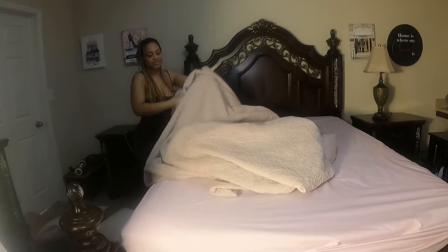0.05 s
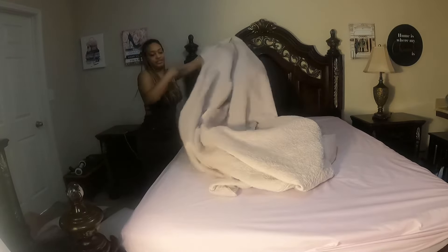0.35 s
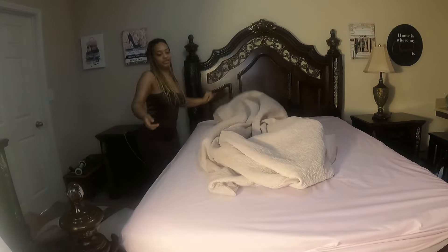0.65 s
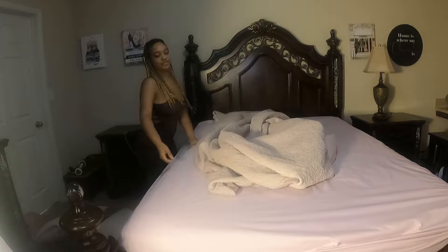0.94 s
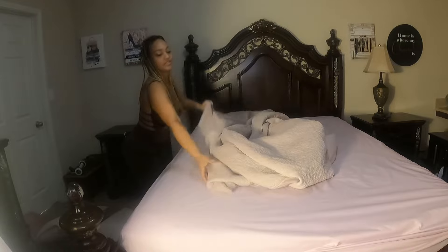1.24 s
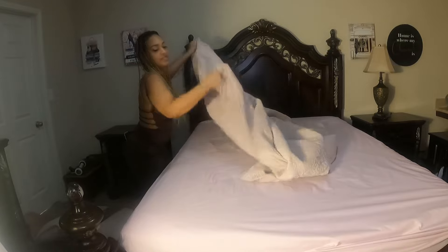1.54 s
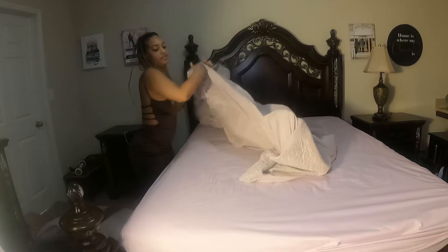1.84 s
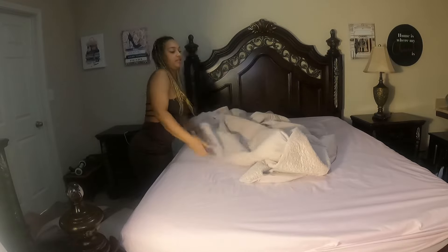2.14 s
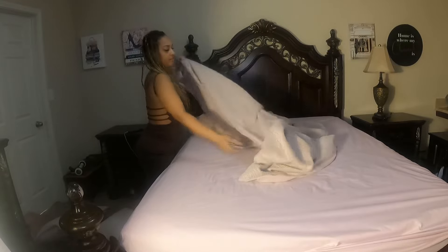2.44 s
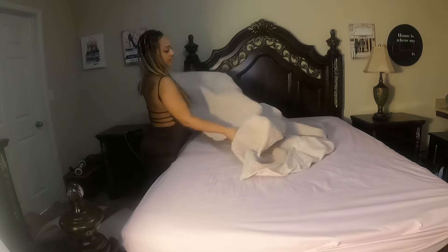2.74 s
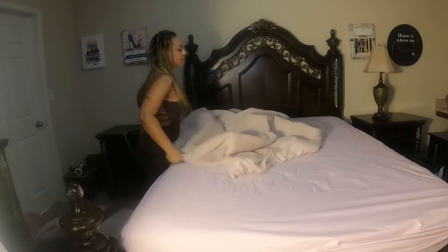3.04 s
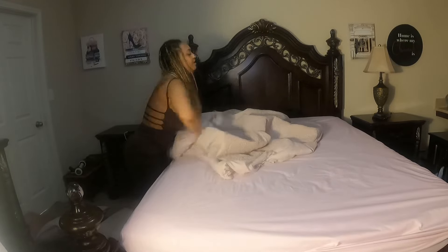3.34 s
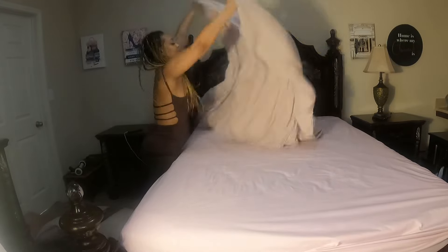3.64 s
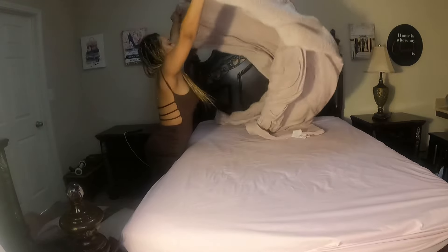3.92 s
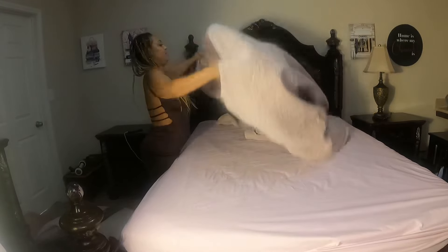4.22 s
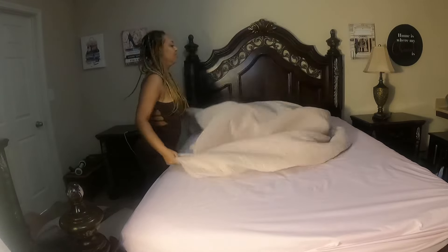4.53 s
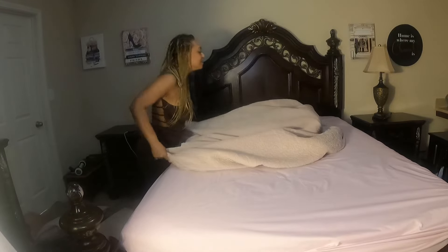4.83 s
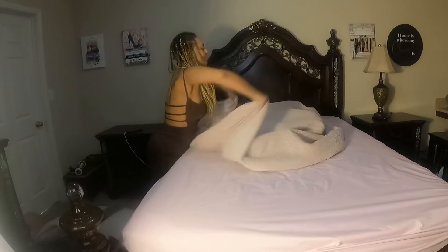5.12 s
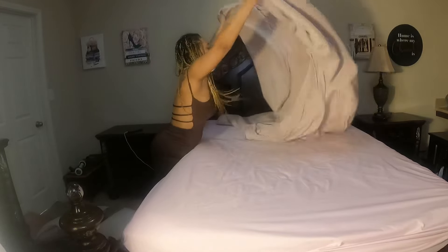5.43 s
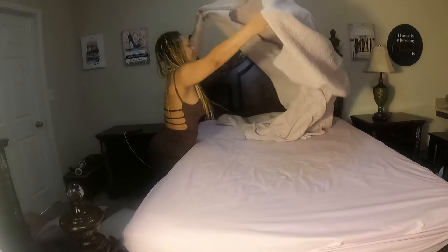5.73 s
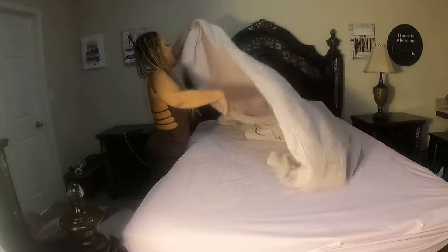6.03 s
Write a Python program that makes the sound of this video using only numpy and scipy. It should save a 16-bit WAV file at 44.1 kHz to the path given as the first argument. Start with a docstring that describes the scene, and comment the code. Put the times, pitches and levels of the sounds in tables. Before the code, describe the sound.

A thick bedspread is tossed, gathered and shaken out over a bed, with cloth rustling, whooshes of air and soft thumps.

```python
"""A thick bedspread is handled over a bed in a small bedroom, above a steady low hum of the room's standing
waves. First it slides, hissing by friction, and is tossed aside; the heap drops at 0.8 s with a wave of air.
From 1.2 s it is gathered up: a nail zips over the weave, folds slap and the hem snaps. It is shaken out at 3.6
s and floats down at 4.4 s, its landing folds exciting mattress and room modes. At 5.2 s a seam ticks through
the fingers and a second shake follows; a last swing comes at 6 s."""
import sys
import numpy as np
from scipy import signal
from scipy.fft import rfft, irfft, next_fast_len
from scipy.io import wavfile
from scipy.ndimage import uniform_filter1d, map_coordinates

SR = 44100
rng = np.random.default_rng(int(sys.argv[2]) if len(sys.argv) > 2 else 0)


def file_out(sig):
    """Save sig as 16-bit WAV at sys.argv[1]."""
    # one column per channel
    cols = np.atleast_2d(sig).T
    # limit, then scale
    lim = np.clip(cols, -1, 1)
    pcm = np.round(lim * 32767).astype(np.int16)
    wavfile.write(sys.argv[1], SR, pcm)


N = 267687

# Standing waves of the room that hum in the background: f/Hz, bandwidth/Hz, level/dB
HUM_RESONANCES = [(156.2, 36, -4.5), (199.5, 29, 0), (284, 7.6, -16)]
# Cloth drawn over cloth: start t/s, duration/s, rustle level/dB, hiss level/dB, swell/dB
PULLS = [ (-0.009, 0.36, -61.5, -63.5, 9.5), (.5, 0.33, -68.5, -75.5, 12), (1.093, 0.085, -77, -66.5, 0.5),
         (1.17, 0.26, -66, -68.5, 13), (1.377, 0.24, -63, -64.5, -5.5), (1.577, .21, -59.5, -59.5, 4),
         (2.03, 0.077, -57, -64.5, 4.5), (2.242, 0.032, -56.5, -71, 3.5), (2.362, 0.28, -54, -57, 5),
         (2.764, 0.16, -58, -63, 5), (3.046, 0.14, -55.5, -58.5, -0.5), (3.425, 0.1, -75, -65, 4),
         (3.516, 0.2, -49, -56, 5.5), (3.717, 0.13, -49, -53.5, 4), (3.982, 0.11, -66.5, -69.5, 2),
         (4.1, 0.15, -79, -72, 3), (4.298, 0.13, -62, -66.5, 5), (4.438, 0.041, -49, -61.5, -0.5),
         (4.566, 0.012, -48.5, -59.5, 1), (4.685, 0.15, -77, -68, -2.5), (5.002, 0.23, -77, -78.5, -9),
         (5.221, 0.082, -43, -47.5, 4), (5.41, 0.06, -58, -65.5, 12), (5.568, 0.072, -63, -62, -3.5),
         (5.85, 0.13, -65, -62, 9), (5.99, 0.1, -46, -55.5, 9)]
# The sheet swung, lifted or let fall: top-speed t/s, rise/s, fall/s, air level/dB, fold level/dB
SHEET_SWINGS = [ (.135, 0.48, 0.3, -51.5, -49.5), (.335, 0.35, 0.13, -61, -43.5),
                (0.393, 0.28, 0.2, -41, -44.5), (0.814, 0.19, 0.13, -25, -30.5),
                (1.2, 0.72, 0.5, -51, -60.5), (1.4, 0.35, 0.55, -53, -49.5), (1.64, 0.24, 0.86, -55.5, -55),
                (2.045, 0.11, 0.16, -54, -41), (2.12, 0.17, 0.063, -33.5, -38), (2.39, 1, 0.92, -49, -47.5),
                (2.535, 0.083, 0.11, -58, -43.5), (2.606, 0.13, 0.089, -34.5, -38),
                (2.845, 0.18, 0.084, -52, -44.5), (2.926, 0.11, 0.075, -60, -44),
                (3.1, 0.21, 0.19, -41, -38), (3.63, 0.31, 0.65, -30.5, -37), (3.764, 0.3, 0.17, -48, -31.5),
                (3.9, 0.25, 0.19, -45, -45), (4.01, 0.069, 0.15, -57, -46), (4.37, 0.23, 0.26, -33, -40.5),
                (4.44, 0.094, 0.23, -29, -42), (4.66, 0.3, 0.27, -44, -50), (5.225, 0.097, 0.3, -52, -35.5),
                (5.33, 0.31, 0.23, -29.5, -33), (5.42, 0.15, 0.19, -29.5, -47.5),
                (5.505, 0.18, 0.4, -35, -41.5), (6.021, 0.15, 0.58, -31.5, -40)]
# Folds landing or pulling taut: t/s, push level/dB, whump level/dB, smack level/dB, T60/s, rise/s
FOLD_IMPACTS = [(0.324, -46, -36, -59, .12, 0.0016), (0.7058, -43, -37, -36.5, 0.12, 0.001),
                (0.775, -36, -50, -62, 0.066, .007), (0.798, -20.5, -46, -53, .06, 0.0024),
                (.817, -40, -33.5, -32, 0.045, 0.00063), (0.844, -25.5, -44, -62, 0.068, 0.0039),
                (1.593, -69, -46, -50.5, 0.37, 0.00048), (2.099, -43, -35, -46, 0.15, 0.0017),
                (2.113, -46, -59, -59, .09, 0.0023), (2.596, -36, -40.5, -52, 0.081, 0.00086),
                (2.813, -48, -55, -51, 0.15, 0.0012), (2.883, -58, -49, -49, 0.15, 0.0009),
                (2.908, -71, -47, -46, 0.065, 0.0012), (3.636, -50, -48, -43, 0.13, 0.0036),
                (3.701, -60, -59, -33.5, 0.2, 0.00037), (3.757, -38, -23.5, -63, 0.056, 0.0024),
                (4.081, -61, -59, -57, 0.056, 0.0016), (4.358, -28, -56, -56, 0.07, 0.0022),
                (4.4056, -20.5, -22.5, -34.5, 0.027, 0.0011), (4.431, -28.5, -43, -55, 0.045, 0.002),
                (4.492, -30, -49, -47, 0.11, 0.0034), (4.565, -66, -40.5, -42.5, 0.15, 0.0024),
                (5.203, -61, -52, -37, 0.22, 0.0019), (5.272, -59, -39, -31, 0.071, 0.00088),
                (5.428, -27.5, -44, -59, 0.08, 0.003), (5.493, -35.5, -41, -64, 0.071, 0.0033),
                (5.938, -53, -46.5, -50, 0.17, 0.0029), (6.009, -33, -49, -43, 0.09, 0.0023),
                (6.026, -28, -38.5, -43.5, 0.17, 0.0014)]
# Standing waves of the room: f/Hz, level/dB, T60/s
ROOM_MODES = [(78, -2.5, 0.24), (138.8, -7.5, 0.25)]
# Flicks of the hem: t/s, peak level/dB, cutoff f/Hz, relative brush level/dB
HEM_SNAPS = [(0.7063, -52, 1190, 3), (0.7907, -37, 2570, -1), (1.1629, -47, 1140, 2), (1.215, -53, 1080, 4),
             (1.584, -37.5, 2950, -1), (1.6055, -49, 1700, -8), (1.6332, -43, 2000, 0),
             (2.1858, -44, 1890, -12.5), (2.883, -38, 1790, 4), (3.569, -38, 4800, 4),
             (3.638, -41, 2500, 9), (3.6638, -35.5, 3980, -2), (3.701, -33, 5500, 6),
             (3.796, -40, 3500, -1), (3.833, -34.5, 9000, 2), (3.8563, -44, 11000, -3),
             (3.878, -38, 9000, -3), (4.365, -42.5, 750, -11), (4.4094, -29.5, 1600, -24),
             (4.435, -40, 9000, 3), (4.477, -42.5, 3000, 6), (4.533, -40, 13000, 0.5),
             (5.176, -41, 10000, 7), (5.241, -31, 5500, 2), (5.5415, -29.5, 8000, -1),
             (5.9332, -38.5, 4800, 5.5), (5.996, -39.5, 4500, 3.5), (6.027, -36.5, 5040, 4),
             (6.044, -36.5, 5000, 6)]
# Folds whipping across the sheet: top-speed t/s, half duration/s, centre f/Hz, level/dB
FOLD_SWISHES = [(0.801, 0.031, 2500, -60), (1.062, 0.022, 5900, -70), (1.405, .014, 4370, -62),
                (2.497, 0.092, 10400, -76), (2.82, 0.019, 3020, -61), (2.905, 0.007, 5860, -66),
                (3.57, 0.035, 5460, -61.5), (3.724, .025, 4000, -56), (3.869, 0.048, 2920, -53.5),
                (4.571, 0.029, 2720, -54), (5.221, 0.056, 640, -44), (5.286, 0.032, 570, -39),
                (5.56, 0.017, 3660, -57), (5.999, 0.004, 3280, -54)]
# A fingernail crossing the weave: t/s, thread f/Hz, level/dB
NAIL_PATH = [(1.376, 1400, -64), (1.384, 1736, -46), (1.39, 2970, -53), (1.396, 5350, -49),
             (1.402, 5640, -74), (1.41, 4030, -49), (1.425, 4970, -69), (1.445, 4600, -80)]
# A seam running through the fingers: t/s, stitch f/Hz, level/dB
SEAM_PATH = [(5.16, 140, -74.5), (5.18, 144, -30.5), (5.29, 110, -26.5), (5.34, 34, -28)]

# Spectral densities of the sources: f/Hz, level/dB
STILL_AIR = [(20, -3), (45, 14), (95, -1.5), (155, -8), (420, -12.5), (800, -23), (1250, -6), (2200, -18),
             (4000, -21), (5400, -17.5), (9000, -27), (14000, -48)]
LIGHT_HISS = [(900, -20.5), (2000, -0.5), (2900, -3), (4000, -3.5), (5400, -3), (7500, -9.5), (8600, -17),
              (12000, -21.5), (14000, -31.5)]  # weave lightly brushed
FIRM_HISS = [(900, -40.5), (2000, -0.5), (2900, 6), (4000, 2.5), (5400, -2), (7500, -8), (8600, -13),
             (12000, -24), (14000, -33)]  # weave firmly rubbed
CREASE_RUSTLE = [(250, -57.5), (600, 5.5), (900, 3), (1250, 1.5), (1700, -2), (2200, -13.5), (3200, -13),
                 (7000, -48)]
CREASE_POP = [(900, -27), (2000, 2), (3200, 1), (5400, -2), (8000, -14), (11000, -13), (14000, -23)]
GENTLE_AIR = [(12, -15), (24, -9), (37, -1.5), (55, 8.5), (80, -21.5), (105, -9.5), (220, -42), (500, -96)]
GUSTING_AIR = [(12, -33), (25, -12.5), (36, -0.5), (52, -3), (66, -2.5), (82, 3), (100, -9), (125, -22),
               (220, -25.5), (500, -94)]
SLOW_FOLDS = [(70, -23.5), (118, -31.5), (152, 0), (205, -3.5), (265, -3), (320, -7.5), (420, -15.5),
              (650, -24), (1500, -68)]
FAST_FOLDS = [(80, -48), (135, -1.5), (205, -7.5), (268, 1.5), (310, -5.5), (390, -8), (600, -18),
              (800, -15.5), (1500, -46.5), (4000, -101)]
PADDING_WHUMP = [(70, -47.5), (150, -6.5), (280, -2), (400, -11), (620, -9.5), (850, -21.5), (2000, -67.5)]
CLOTH_SMACK = [(250, -32.5), (600, 6), (900, 8), (1300, 4.5), (1700, -7.5), (2100, -25), (3200, -31),
               (6000, -32), (13000, -61)]
HEM_CRACK = [(300, -37), (1200, 10.5), (3200, 9), (6000, 0.5), (12500, -16), (14000, -27)]
STITCH_TICK = [(500, -35), (2500, 14), (5000, 3.5), (9000, -5.5), (11000, -14), (14000, -24)]

# Reverberation time of the bedroom: f/Hz, T60/s
ROOM_DECAY = [(80, 0.93), (300, 0.51), (2000, 0.16), (10000, 0.21)]
# Peaks and dips due to close walls: f/Hz, bandwidth/Hz, gain/dB
WALL_BANDS = [(61, 55, -6), (151, 22, 3), (243.4, 119, -5.5), (268.6, 10.3, 4), (372.4, 7.5, 3.5),
              (467.4, 44, -5.5), (478, 35, 7.5), (665, 19, -5.5), (798, 256, -5), (970, 5.4, 2),
              (1200, 61, 1), (1245, 61, -3), (1490, 110, -1.5), (2770, 12, 0)]
# Stereo width: f/Hz, side minus mid level/dB
SIDE_LEVEL = [(60, -39), (125, -19), (250, -23), (500, -13), (1000, -10), (2000, -7), (4000, -8.4),
              (8000, -6), (12000, -2.8)]
# Imbalance of the microphone ports: f/Hz, left minus right level/dB
LEFT_EXCESS = [(125, -.1), (250, 0), (500, 2.1), (1000, 3), (2000, 2.6), (4000, 1.7), (8000, 1.8),
               (12000, 2.6)]
# Phase lead of the left port: f/Hz, phase/rad
LEFT_LEAD = [(60, 0.0), (125, -0.05), (250, -0.08), (500, -0.13), (1000, -0.33), (2000, -0.6),
             (3000, -0.59), (4500, -0.13), (7000, -0.12), (11000, -0.05)]


def amp(db):
    """Amplitude ratio of a level in decibels."""
    return 10 ** (np.asarray(db) / 20)


def unit(x):
    """Normalisation to rms 1."""
    return x / np.sqrt(np.mean(x ** 2) + 1e-20)


def along(points, hz):
    """Interpolation on a logarithmic frequency axis."""
    f, values = np.transpose(points)
    return np.interp(np.log(hz + 1), np.log(f + 1), values)


def curves(rows):
    """Linear interpolation in time of each column after the first."""
    times, *columns = np.transpose(rows)
    return [np.interp(np.arange(N) / SR, times, column) for column in columns]


def wobble(rate):
    """Smooth random modulation: a spline through rate knots a second."""
    knots = rng.standard_normal(int(N * rate / SR) + 4)
    return map_coordinates(knots, [np.arange(N) * rate / SR])


def resonance(f, centre, width):
    """Band-pass response of a damped oscillator."""
    return 1j * f * width / (centre ** 2 - f ** 2 + 1j * f * width)


def filtered(x, response):
    """Linear filtering: the spectrum of x times a frequency response."""
    size = x.shape[-1]
    padded = next_fast_len(size + SR // 2)
    return irfft(rfft(x, padded) * response(np.fft.rfftfreq(padded, 1 / SR)), padded)[..., :size]


def coloured(x, spectrum, size=16384):
    """Minimum-phase filtering: causal, so attacks stay sharp."""
    cepstrum = irfft(np.log(amp(along(spectrum, np.fft.rfftfreq(size, 1 / SR)))))
    cepstrum[1:size // 2] *= 2
    cepstrum[size // 2 + 1:] = 0
    ring = irfft(np.exp(rfft(cepstrum))).reshape((1,) * (x.ndim - 1) + (-1,))
    return signal.fftconvolve(x, ring, axes=-1)[..., :x.shape[-1]]


def stereo(pair):
    """Mid-side mixing: left and right are coherent in the bass, less so in the treble."""
    mid, side = pair[0], filtered(pair[1], lambda hz: amp(along(SIDE_LEVEL, hz)))
    return np.array([mid + side, mid - side])


def add(track, s, sound):
    """Superposition of a sound on a track at time s."""
    part = track[max(round(s * SR), 0):][:len(sound)]
    part += sound[:len(part)]


def grains(spectrum, rate, spread_db, smooth_db):
    """Shot noise: tiny contacts of unequal size over a smooth rub, in stereo at rms 1."""
    hits = (rng.random((2, N)) < rate / SR) * rng.choice([-1, 1], (2, N))
    sizes = amp(spread_db * np.clip(rng.standard_normal((2, N)), -2, 2))
    contacts = unit(hits * sizes) + amp(smooth_db) * rng.standard_normal((2, N))
    return unit(stereo(coloured(contacts, spectrum)))


def evened(x, window_s):
    """Division by the running rms flattens slow random swells."""
    power = uniform_filter1d(np.mean(x ** 2, axis=0), max(int(window_s * SR), 1))
    return unit(x / np.sqrt(np.abs(power) + 0.00086))


def blend(gentle, hard, over_db):
    """Equal-power crossfade between textures as the level passes a threshold."""
    share = (1 + np.tanh(over_db / 7)) / 2
    return np.sqrt(1 - share) * gentle + np.sqrt(share) * hard


def room_tone(hiss_db=-66.5, drone_db=-65):
    """Resonance: noise excites the room's standing waves, which hum over the hiss of still air."""
    still = unit(stereo(coloured(rng.standard_normal((2, N)), STILL_AIR)))
    hum_response = lambda f: sum(amp(db) * resonance(f, hz, width) ** 2 for hz, width, db in HUM_RESONANCES)
    drone = unit(stereo(filtered(rng.standard_normal((2, N)), hum_response)))
    return amp(hiss_db) * still + amp(drone_db) * drone


def slide_levels(folds_db, attack_s=0.044, release_s=0.082, crease_db=-15, brush_db=-36.5):
    """Incoherent sources add in power: rustle and hiss levels of all pulls and swinging folds."""
    t = np.arange(N) / SR
    rustle, hiss = amp(folds_db + crease_db) ** 2, amp(folds_db + brush_db) ** 2
    for s, length, rustle_db, hiss_db, swell_db in PULLS:
        fade = np.maximum((s - t) / attack_s, (t - s - length) / release_s).clip(0, 20)
        progress = np.clip((t - s) / length, 0, 1)
        power = (np.exp(-fade) * amp(swell_db * (progress - 0.5))) ** 2
        rustle += amp(rustle_db) ** 2 * power
        hiss += amp(hiss_db) ** 2 * power
    return 10 * np.log10(rustle), 10 * np.log10(hiss)


def rub(rustle_db, hiss_db, firm_db=-56):
    """Friction: creases rustle; the weave whispers under a light touch and rasps under a firm one."""
    flutter = wobble(45)  # creases catch and let go
    rustle = amp(rustle_db + 1.34 * flutter)
    rustle = rustle * grains(CREASE_RUSTLE, rate=800, spread_db=4.5, smooth_db=0.5)
    light = grains(LIGHT_HISS, rate=1500, spread_db=3, smooth_db=6)
    firm = grains(FIRM_HISS, rate=820, spread_db=11.5, smooth_db=6.5)
    return rustle + amp(hiss_db + 0.31 * flutter) * blend(light, firm, hiss_db - firm_db)


def crinkles(hiss_db, rate=70, over_db=20.5, spread_db=4):
    """A Poisson process: single creases pop at random, louder as the cloth slides harder."""
    pops = (rng.random(N) < rate / SR) * rng.choice([-1, 1], N)
    size_db = hiss_db + over_db + spread_db * rng.standard_normal(N).clip(-2, 2)
    return coloured(pops * amp(size_db), CREASE_POP)


def swing_levels(span_db=28, air_steepness=1.36, air_lag_s=0.018):
    """Power laws of speed set air and fold levels; the air grows more steeply and trails the folds."""
    t = np.arange(N) / SR
    air, folds = np.zeros(N), np.zeros(N)
    for s, rise, fall, air_db, folds_db in SHEET_SWINGS:
        speed_db = -span_db * np.maximum((s - t) / rise, (t - s) / fall).clip(max=6)
        air += amp(air_db + air_steepness * speed_db) ** 2
        folds += amp(folds_db + speed_db) ** 2
    return np.interp(t - air_lag_s, t, 10 * np.log10(air)), 10 * np.log10(folds)


def billow(air_db, folds_db, gust_db=-50, full_db=-43):
    """Displacement: the sheet pushes air; its tumbling folds boom when slow, sound fuller when fast."""
    draught = evened(grains(GENTLE_AIR, rate=48, spread_db=8.5, smooth_db=4.5), window_s=0.06)
    gust = evened(grains(GUSTING_AIR, rate=89, spread_db=-5.5, smooth_db=-4), window_s=0.0385)
    slow = evened(grains(SLOW_FOLDS, rate=180, spread_db=2, smooth_db=-3), window_s=0.061)
    fast = evened(grains(FAST_FOLDS, rate=400, spread_db=3, smooth_db=-3), window_s=0.023)
    ripple_db = 0.5 * wobble(22)  # the air surges as the sheet ripples
    air = amp(air_db + ripple_db) * blend(draught, gust, air_db - gust_db)
    folds = amp(folds_db + 1.6 * wobble(52)) * blend(slow, fast, folds_db - full_db)
    return air + folds


def flaps(push_s=0.00244, onset_db=1, onset_t60=0.0043, thud_hz=279.6, thud_db=1.5, thud_t60=0.06):
    """Impulse excitation: a fold's air push rings the room modes as mattress, padding and cloth sound."""
    track, t = np.zeros(N), np.arange(SR // 3) / SR
    u = t / push_s - 2
    push = (1 - 2 * u ** 2) * np.exp(-u ** 2)  # suction, pressure, suction
    modes = sum(amp(db - 60 * t / t60) * np.sin(2 * np.pi * hz * t) for hz, db, t60 in ROOM_MODES)
    # each spot of the mattress has its own pitch, within 0.3 octave
    pitches = thud_hz * 2 ** (0.3 * rng.uniform(-1, 1, len(FOLD_IMPACTS)))

    def puff(spectrum):
        """Stationary noise, taken after the filter has settled."""
        noise = coloured(rng.standard_normal((1, 2 * len(t))), spectrum)
        return evened(noise[:, len(t):], window_s=0.039)[0]

    for (s, push_db, whump_db, smack_db, t60, rise), hz in zip(FOLD_IMPACTS, pitches):
        thud = amp(whump_db + thud_db - 60 * t / thud_t60) * np.sin(2 * np.pi * hz * t)
        contact = amp(-60 * t / t60) * (1 + amp(onset_db - 60 * t / onset_t60))
        fabric = contact * (amp(whump_db) * puff(PADDING_WHUMP) + amp(smack_db) * puff(CLOTH_SMACK))
        attack = 1 - np.exp(-t / rise)
        add(track, s, attack * (amp(push_db) * (push + modes) + thud + fabric))
    return track


def snaps(grit_cycles=24, grit_db=-3, brush_t60=0.12):
    """Low-passed impulses: the hem cracks with grit and a brush, duller and longer where doubled."""
    track, t = np.zeros(N), np.arange(SR // 8) / SR
    burst = lambda t60: unit(rng.standard_normal(len(t)) * amp(-60 * t / t60)) / np.sqrt(len(t))
    for s, db, cutoff_hz, brush_db in HEM_SNAPS:
        grit = amp(grit_db) * burst(grit_cycles / cutoff_hz)
        flick = (t == 0) + grit + amp(brush_db) * burst(brush_t60)
        low_pass = lambda f: 1 / (1 + 1.4j * f / cutoff_hz - (f / cutoff_hz) ** 2)
        crack = filtered(coloured(flick, HEM_CRACK), low_pass)
        add(track, s, amp(db) * crack / np.abs(crack).max())
    return track


def swishes(width_octaves=0.63):
    """Band noise under a Gaussian envelope: each whipping fold gives a surge of hiss in its own band."""
    track, t = np.zeros(N), np.arange(SR // 2) / SR
    for s, half_s, centre_hz, db in FOLD_SWISHES:
        band = lambda f: 1 / (1 + (np.log2((f + 1) / centre_hz) / width_octaves) ** 2) ** 1.94
        surge = np.exp(-((t - t.mean()) / half_s) ** 2)
        hiss = unit(filtered(rng.standard_normal(len(t)), band))
        add(track, s - t.mean(), amp(db) * surge * hiss)
    return track


def nail(jitter=0.11):
    """Periodic forcing: the pitch is the uneven, quickly rising rate at which threads pass a nail."""
    rate_hz, db = curves(NAIL_PATH)
    t = np.arange(N) / SR
    phase = 2 * np.pi * np.cumsum(rate_hz * (1 + jitter * wobble(2200))) / SR
    touching = (t > NAIL_PATH[0][0]) & (t < NAIL_PATH[-1][0])
    return amp(db) * np.sin(phase) * touching


def seam(jitter=0.24, spread_db=2):
    """A quasi-periodic pulse train: stitches tick past the fingers at unequal strength."""
    rate_hz, db = curves(SEAM_PATH)
    t = np.arange(N) / SR
    stitches_passed = np.floor(np.cumsum(rate_hz * (1 + jitter * wobble(60))) / SR)
    touching = (t > SEAM_PATH[0][0]) & (t < SEAM_PATH[-1][0])
    ticks = np.diff(stitches_passed, prepend=0) * touching
    return coloured(ticks * amp(db + spread_db * rng.standard_normal(N)), STITCH_TICK)


def bedroom(x, wet_db, low_cut_hz=190):
    """Reverberation: the direct sound plus the short, exponentially decaying tail of a furnished room."""
    hz, t, noise = signal.stft(rng.standard_normal((2, SR // 2)), SR, nperseg=256)
    decay = amp(-60 * t / along(ROOM_DECAY, hz)[:, None])
    tail = signal.istft(noise * decay, SR, nperseg=256)[1]
    tail = np.pad(tail / np.linalg.norm(tail[0]), ((0, 0), (SR // 250, 0)))  # 4 ms delay
    tail = filtered(tail, lambda f: (f / np.hypot(f, low_cut_hz)) ** 2)
    return x + amp(wet_db) * stereo(signal.fftconvolve(x[None], tail, axes=1)[:, :N])


def walls(f):
    """Interference: close walls reinforce some frequencies and weaken others."""
    return np.prod([1 + (amp(db) - 1) * resonance(f, hz, width) for hz, width, db in WALL_BANDS], axis=0)


def ports(hz):
    """Level and phase differences: the left port hears the bed a little louder and later in phase."""
    ratio = amp(along(LEFT_EXCESS, hz) / 2) * np.exp(0.5j * along(LEFT_LEAD, hz))
    return np.array([ratio, 1 / ratio])


def scene():
    """Superposition: the bedspread, a little left of the microphone, sounds over the room tone."""
    air_db, folds_db = swing_levels()
    rustle_db, hiss_db = slide_levels(folds_db)
    cloth = billow(air_db, folds_db) + rub(rustle_db, hiss_db)
    transients = flaps() + snaps() + swishes() + crinkles(hiss_db) + seam() + nail()
    bedspread = cloth + bedroom(transients, wet_db=-4)
    return filtered(bedspread, lambda hz: walls(hz) * ports(hz)) + room_tone()


def record(dry, top_hz=13850):
    """Band limiting: an ideal low-pass filter passes nothing above top_hz."""
    return filtered(dry, lambda hz: hz < top_hz)


dry = scene()
out = record(dry)
file_out(out)
```